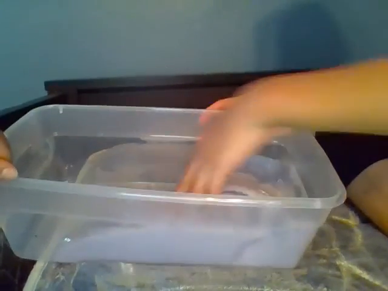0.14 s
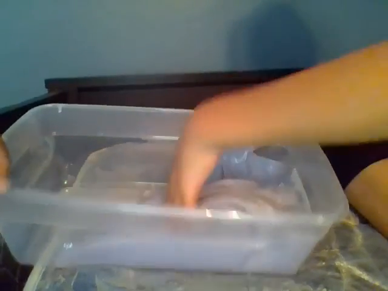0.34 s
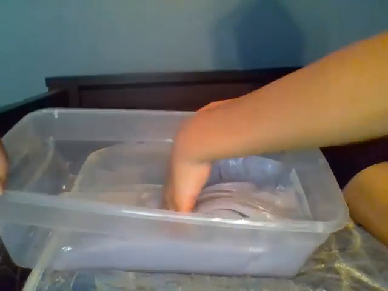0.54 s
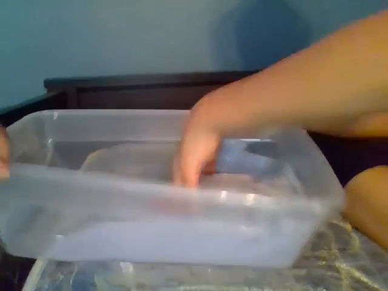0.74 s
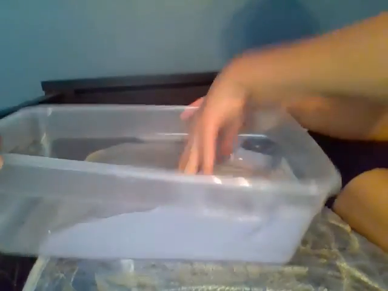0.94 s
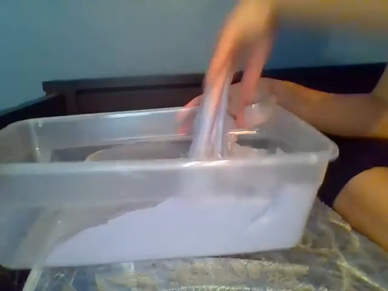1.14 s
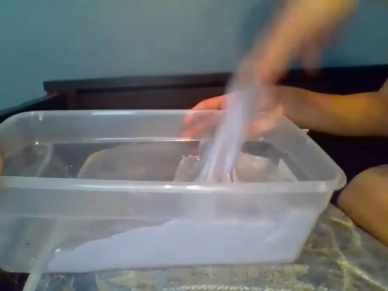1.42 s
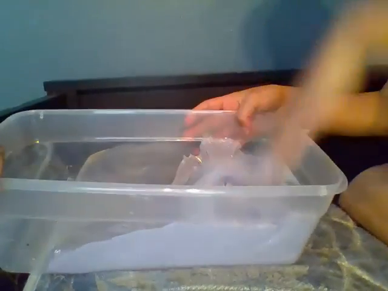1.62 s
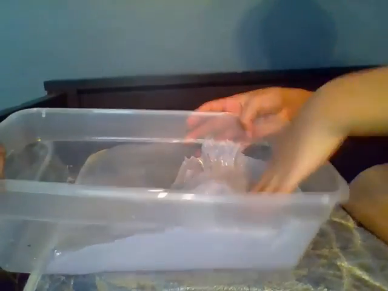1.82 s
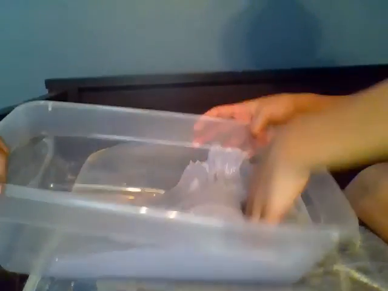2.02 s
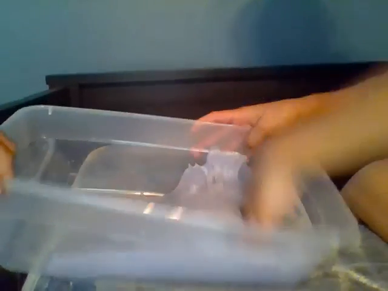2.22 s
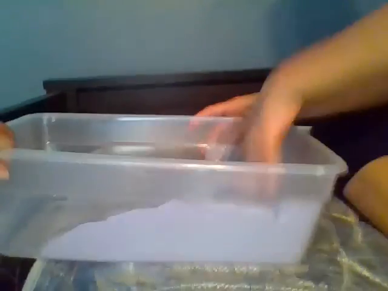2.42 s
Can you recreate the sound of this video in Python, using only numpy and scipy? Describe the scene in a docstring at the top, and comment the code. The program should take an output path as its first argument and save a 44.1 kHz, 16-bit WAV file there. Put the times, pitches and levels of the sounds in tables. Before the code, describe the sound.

Slime is kneaded in a plastic tub in a small bedroom, crackling faintly, then tearing with wet snaps and pops twice. Dull, dry knocks recur very close to the microphone over steady hiss and the shifting tub's rumble.

```python
"""A small bedroom, where a hand kneads soft slime in a plastic tub. The slime crackles faintly under the
fingers; now and then its skin tears open with a spit and sharp snaps, and the air pockets beneath ring
as pops. The tub and the room echo these briefly. Very close to the microphone the same dull knock recurs,
dry, over steady hiss and the rumble of the shifting tub."""
import sys
import numpy as np
from scipy import signal
from scipy.fft import rfft, irfft
from scipy.io import wavfile

SR = 44100
rng = np.random.default_rng(int(sys.argv[2]) if len(sys.argv) > 2 else 0)


def store_wav(level_fs):
    """Save 16-bit WAV to argv[1]."""
    pcm = np.round(np.clip(np.atleast_2d(level_fs), -1, 1) * 32767)
    wavfile.write(sys.argv[1], SR, pcm.T.astype(np.int16))


N = 112454
TIME = np.arange(N) / SR
BAND_LIMIT_HZ = 16050


def amp(db):
    """Decibels to gain."""
    return 10 ** (np.asarray(db) / 20)


def unit(x):
    """Scales to rms 1."""
    return x / np.sqrt(np.mean(x ** 2) + 1e-20)


def curve_at(points, hz):
    """Reads a table on a log-frequency axis."""
    f, value = np.transpose(points)
    return np.interp(np.log(hz + 1), np.log(f + 1), value)


def highpass_gain(hz, edge_hz, order):
    """Gain of a Butterworth high-pass."""
    return hz ** order / np.hypot(hz ** order, float(edge_hz) ** order)


def shaped(x, gain):
    """Filters x by a gain that is a function of frequency."""
    return irfft(rfft(x) * gain(np.fft.rfftfreq(len(x), 1 / SR)), len(x))


def coloured(x, points):
    """Gives x a spectrum, at rms 1."""
    return unit(shaped(x, lambda hz: amp(curve_at(points, hz))))


def swells(rows):
    """Sums bell-shaped envelopes, one for each (middle [s], half length [s], level [dB])."""
    return sum(amp(db) * np.exp(-((TIME - s) / half) ** 2) for s, half, db in rows)


def grain_sizes(count, spread_db):
    """Random gains for crackle: many small, a few large."""
    return amp(spread_db * np.minimum(rng.exponential(1, count), 4))


def add(mix, s, sound):
    """Mixes a sound in at s seconds."""
    part = mix[max(round(s * SR), 0):][:len(sound)]
    part += sound[:len(part)]


# Spectra of the rumble and the hiss at the microphone (frequency [Hz], relative level [dB])
RUMBLE_SPECTRUM = [(3, 1.5), (10, 7.5), (20, -6), (35, -11), (60, -16.5), (140, -24.5), (260, -30),
                   (600, -50)]
HISS_SPECTRUM = [(100, 0), (300, 6.5), (1000, 1.5), (4500, -3), (9000, -3.5), (14500, -0.5), (16000, -2)]
# Handling of the tub, lifting the rumble (time [s], gain [dB])
HANDLING = [(0, 2), (.5, 2), (.76, 11), (1.15, 0), (1.6, -1), (2.25, 6), (2.42, 14)]


def background(rumble_db=-40.5, hiss_db=-52.5):
    """Lumpy rumble that grows as the tub is pushed about, and steady hiss."""
    handling_db = np.interp(TIME, *np.transpose(HANDLING))
    rumble = amp(rumble_db + handling_db) * coloured(rng.standard_normal(N), RUMBLE_SPECTRUM)
    hiss = amp(hiss_db) * coloured(rng.standard_normal(N), HISS_SPECTRUM)
    return rumble + hiss


# Reverberation of the bedroom (frequency [Hz], time to fall 60 dB [s])
ROOM_DECAY = [(200, 0.6), (1300, 0.31), (4000, 0.36), (15000, 0.19)]


def bedroom(x, delay_s=0.0053, gain_db=-17):
    """Sparse reflections come back from the room, each band dying at its own speed."""
    size = SR // 2
    reflections = rng.standard_normal(size) * (rng.random(size) < .1)
    hz, t, bands = signal.stft(reflections, SR, nperseg=256)
    decay = amp(-60 * t / curve_at(ROOM_DECAY, hz)[:, None])
    _, tail = signal.istft(bands * decay, SR, nperseg=256)
    tail *= TIME[:len(tail)] > delay_s
    return amp(gain_db) * signal.fftconvolve(x, tail / np.linalg.norm(tail))[:N]


# Echoes off nearby furniture (delay [s], gain [dB])
FURNITURE_ECHOES = [(.0245, -31.5), (.0505, -23.5)]


def furniture(x, top_hz=2470):
    """Distinct, dull reflections make the tails stutter."""
    out = np.zeros(N)
    dull = shaped(x, lambda hz: 1 - highpass_gain(hz, top_hz, order=2) ** 2)
    for delay, db in FURNITURE_ECHOES:
        add(out, delay, amp(db) * dull)
    return out


# The tub dragging on the floor (middle [s], half length [s], level [dB])
DRAGS = [(1.876, 0.067, -51), (2.217, 0.023, -42.5)]


def tub_drags(hum_hz=92, waver_share=.08):
    """The base of the tub hums in swells as it shifts, its pitch wavering."""
    waver = unit(shaped(rng.standard_normal(N), lambda hz: np.exp(-(hz / 20) ** 2)))
    pitch = hum_hz * (1 + waver_share * waver)
    return swells(DRAGS) * unit(np.sin(2 * np.pi * np.cumsum(pitch) / SR))


def finger_rub(middle_s=0.3, half_s=0.097, level_db=-57, centre_hz=1610, half_width_hz=160):
    """A finger slides faintly along the plastic: one swell of narrow-band noise."""
    band = shaped(rng.standard_normal(N), lambda hz: 1 / (1 + ((hz - centre_hz) / half_width_hz) ** 2))
    return swells([(middle_s, half_s, level_db)]) * unit(band)


# Dull knocks, very close to the microphone (time [s], level [dB])
KNOCKS = [(0.1539, -17), (0.6063, -17), (.7404, -16.5), (0.9304, -16), (1.3635, -17.5), (2.2797, -16),
          (2.477, -17)]
# Ring of each knock (frequency [Hz], relative level [dB], time to fall 60 dB [s])
KNOCK_MODES = [(201, -13, 0.059), (311, -14, 0.047), (444, -21, 0.035), (678, -25, 0.09)]
# Spectrum of the scrape just ahead of it (frequency [Hz], relative level [dB])
SCRAPE_SPECTRUM = [(900, -3.5), (1900, -1.5), (3400, -5), (8000, -12.5), (9050, -2.5), (9900, -9),
                   (16000, -13)]


def knocks(rise_s=0.0006, push_s=0.0024, edge_s=0.00032, settle_db=-19.5, settle_s=0.014,
           scrape_lead_s=0.0019, scrape_s=0.00089, scrape_db=-11):
    """A tiny scrape, then a blunt push that rings briefly and settles."""
    out, t = np.zeros(N), TIME[:SR // 3]
    hold = np.clip((push_s - t) / edge_s / 2 + .5, 0, 1) * (1 - amp(settle_db))
    settle = amp(settle_db) * np.exp(-t / settle_s)
    push = (hold + settle) * np.minimum(t / rise_s, 1)
    pole = np.exp(-1 / (edge_s * SR))
    body = signal.lfilter([1 - pole], [1, -pole], push)  # a low-pass rounds the corners
    body += sum(amp(db - 60 * t / t60) * np.sin(2 * np.pi * hz * t) for hz, db, t60 in KNOCK_MODES)
    scrape = coloured(rng.standard_normal(len(t)), SCRAPE_SPECTRUM) * t / scrape_s * np.exp(-t / scrape_s)
    scrape *= np.sqrt(scrape_s * SR) / np.linalg.norm(scrape)
    for s, db in KNOCKS:
        add(out, s, amp(db) * body)
        add(out, s - scrape_lead_s, amp(db + scrape_db) * scrape)
    return out


# Resonances of the hollow around the slime (frequency [Hz], relative gain [dB], time to fall 60 dB [s])
TUB_MODES = [(1730, -22, 0.11), (2300, -13, 0.049), (3610, -11, 0.025), (4115, -9.5, 0.049),
             (6900, -35, 0.059)]


def tub(x, wall_span_s=0.008, wall_fade_s=0.0025, wall_db=-11.5):
    """The tub's walls echo at once, and its hollow rings briefly."""
    t = TIME[:SR // 8]
    echoes = rng.standard_normal(len(t)) * np.exp(-t / wall_fade_s) * (t > t[16]) * (t < wall_span_s)
    response = amp(wall_db) * echoes / np.linalg.norm(echoes)
    for hz, db, t60 in TUB_MODES:
        decay_samples = t60 * SR / np.log(1000)
        response += 4 * amp(db - 60 * t / t60) * np.cos(2 * np.pi * hz * t) / decay_samples
    return x + signal.fftconvolve(x, response)[:N]


# Fingers squeezing the slime in the tub (middle [s], half length [s], level [dB])
SQUEEZES = [(0.303, 0.16, -59), (0.505, 0.037, -54.5), (0.697, 0.053, -44.5), (0.806, 0.15, -49),
            (1.866, 0.052, -55), (2.143, 0.062, -43), (2.272, 0.06, -47), (2.412, 0.068, -46)]
# Spectrum of its crackle (frequency [Hz], relative level [dB])
SQUELCH_SPECTRUM = [(150, -10), (280, -7), (550, 1), (950, -6), (1400, -3), (2200, -9), (4200, -10.5),
                    (9000, -18), (16000, -19)]


def squelch(bubbles_per_s=2600):
    """Countless tiny bubbles crackle under each squeeze."""
    clicks = rng.choice([-1., 1.], N) * grain_sizes(N, spread_db=3.5)
    clicks *= rng.random(N) < bubbles_per_s / SR
    return swells(SQUEEZES) * coloured(clicks, SQUELCH_SPECTRUM)


# Air pockets under the skin (time [s], level [dB], starting pitch [Hz], time to fall 60 dB [s])
POPS = [(.388, -32, 695, 0.013), (.520, -35.5, 616, 0.026), (.9795, -20.5, 1096, 0.023),
        (.9795, -24.5, 2390, 0.025), (.984, -22, 744, 0.013), (1.0355, -16, 1250, 0.019),
        (1.0355, -17, 2174, 0.045), (1.036, -14, 4063, 0.027), (1.0412, -2.5, 1454, 0.01),
        (1.047, -20.5, 1864, 0.04), (2.076, -34, 1700, 0.045), (2.122, -29, 1666, 0.032),
        (2.156, -32, 1690, 0.025), (2.4068, -5.5, 6870, 0.013), (2.407, -7.5, 7420, 0.017),
        (2.411, -21, 421, 0.088), (2.419, -18, 2260, 0.043), (2.4218, -19, 1328, 0.032),
        (2.423, -27, 1720, 0.028), (2.430, -17, 616, 0.023), (2.4805, -10, 576, 0.013),
        (2.4803, -3.5, 1246, 0.03), (2.48, -5.5, 2990, 0.0099), (2.483, -16.5, 2273, 0.032),
        (2.503, -26, 1210, 0.11)]


def pops(rise_s=0.00082, glide_share=0.0377, glide_s=0.0058):
    """Each air pocket rings, climbing in pitch as it opens, and radiates little below that pitch."""
    out, t = np.zeros(N), TIME[:SR // 6]
    for s, db, hz, t60 in POPS:
        pitch = hz * (1 + glide_share * (1 - np.exp(-t / glide_s)))
        envelope = amp(db - 60 * t / t60) * (1 - np.exp(-t / rise_s))
        ring = envelope * np.sin(2 * np.pi * np.cumsum(pitch) / SR)
        low_cut = signal.butter(6, .75 * hz, "high", fs=SR, output="sos")
        add(out, s, signal.sosfilt(low_cut, ring))
    return out


# Sharp snaps of the slime's film (time [s], relative level [dB], centre [Hz])
SNAPS = [(0.251, -23.5, 8900), (0.5231, -29.5, 1520), (0.6249, -24, 2600), (0.79, -25, 3880),
         (0.806, -19.5, 6750), (0.9758, -15, 6960), (0.9808, -7.5, 9900), (1.0306, -2.5, 14100),
         (1.0376, 2, 13700), (1.0372, -7, 5860), (1.04, -4, 14100), (1.7964, -30, 11000),
         (2.1235, -24.5, 3150), (2.158, -16.5, 10500), (2.4070, 9.5, 10300), (2.4076, -3, 5400),
         (2.424, -21, 5000), (2.4316, -4, 2600), (2.4796, -4, 12900)]


def snaps(fade_s=0.00046, width_octaves=0.85):
    """Thin films break in under a millisecond, each with a burst of band-shaped noise."""
    out, t = np.zeros(N), TIME[:1024]
    fade = np.exp(-t / fade_s)
    for s, db, centre in SNAPS:
        def band(hz):
            peak = 1 / (1 + (np.log2((hz + 1) / centre) / width_octaves) ** 2) ** 2
            return peak * highpass_gain(hz, centre / 6, order=3) * (hz < BAND_LIMIT_HZ)
        fizz = shaped(rng.standard_normal(len(t)), band)
        add(out, s, .5 * amp(db) * unit(fizz * fade) * np.sqrt(np.mean(fade ** 2)))
    return out


# The four bands that colour a tear (frequency [Hz])
TEAR_BANDS = [600, 2500, 7000, 14000]
# The skin tearing open (peak time [s], rise [s], fall [s], level in each band [dB], low edge [Hz])
TEARS = [(0.9806, 0.0029, 0.0043, -18, -26, -24, -25.5, 550),
         (0.9852, 0.00099, 0.0072, -11.5, -27, -28, -32, 530),
         (1.0362, 0.0031, 0.0035, -24, -13.5, -14.5, -11, 1250),
         (1.0420, 0.00053, 0.003, 1, -12, -14, -36, 1310),
         (2.4079, 0.0018, 0.0065, -45, -14.5, -8, -18, 1300),
         (2.4245, 0.0074, 0.0044, -10.5, -14.5, -25, -46, 370),
         (2.4318, 0.00048, 0.013, -25, -14, -33, -34, 450),
         (2.4820, 0.002, 0.003, -1, -9.5, -17.5, -5.5, 455),
         (2.497, 0.0091, 0.029, -16, -34, -38, -30.5, 620)]


def tears():
    """A spit of dense crackle swells and dies as the skin gives way."""
    out, t = np.zeros(N), TIME[:8192]
    lead_s = t[1024]
    for s, rise, fall, *band_db, low_hz in TEARS:
        crackle = unit(rng.standard_normal(len(t)) * grain_sizes(len(t), spread_db=4))
        crackle *= np.exp(-np.maximum((lead_s - t) / rise, (t - lead_s) / fall))
        spectrum = list(zip(TEAR_BANDS, band_db))
        spit = shaped(crackle, lambda hz: amp(curve_at(spectrum, hz)) * highpass_gain(hz, low_hz, order=7))
        add(out, s - lead_s, spit)
    return out


def scene():
    """One microphone hears the slime with the tub and the room around it; the knocks are close and dry."""
    slime = tub(tears() + snaps() + squelch()) + pops() + finger_rub()
    slime_in_room = slime + furniture(slime) + bedroom(slime)
    return (slime_in_room + knocks() + tub_drags() + background())[None]


def record(dry):
    """The highest peaks overload softly; then a low-pass removes the top of the treble."""
    ceiling = 0.55
    clipped = dry / (1 + (dry / ceiling) ** 10) ** (1 / 10)
    low_pass = signal.firwin(255, BAND_LIMIT_HZ, window=("kaiser", 8), fs=SR)
    return signal.oaconvolve(clipped, low_pass[None], "same")


dry = scene()
out = record(dry)
store_wav(out)
```